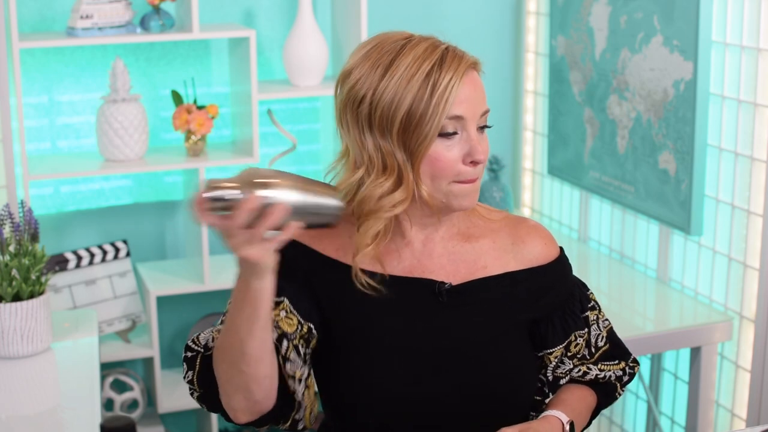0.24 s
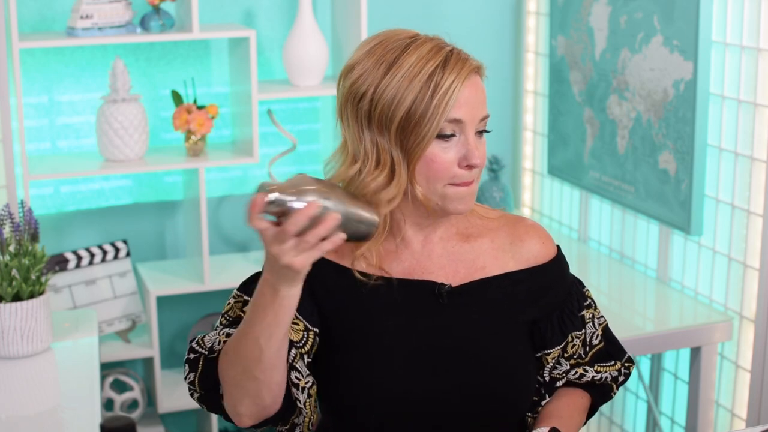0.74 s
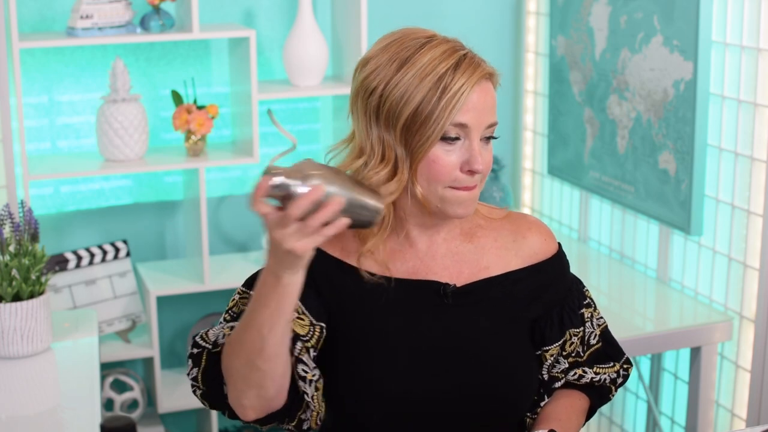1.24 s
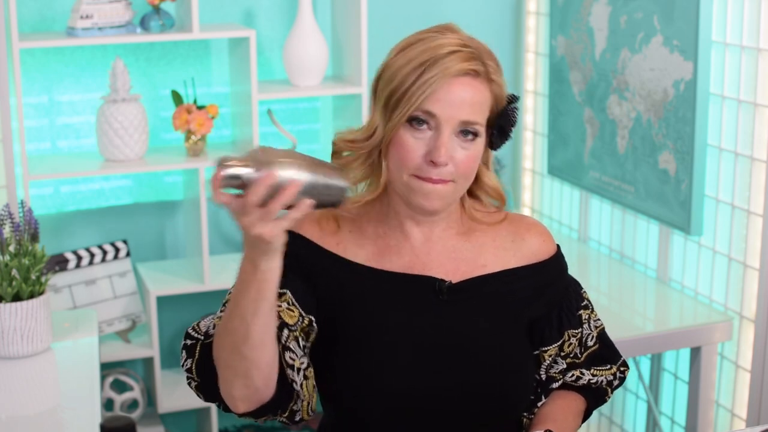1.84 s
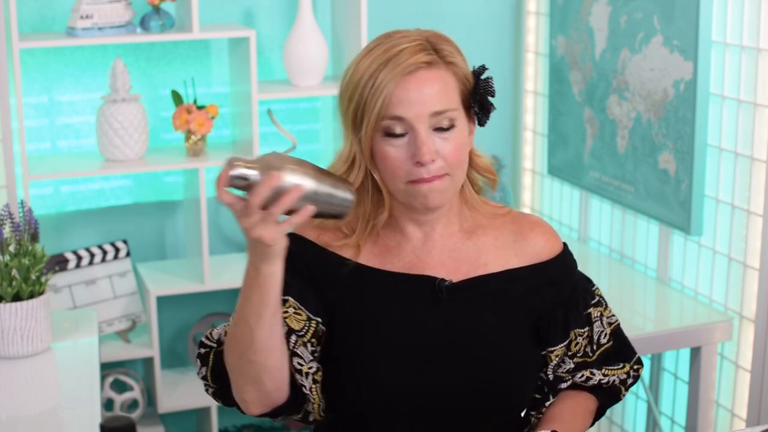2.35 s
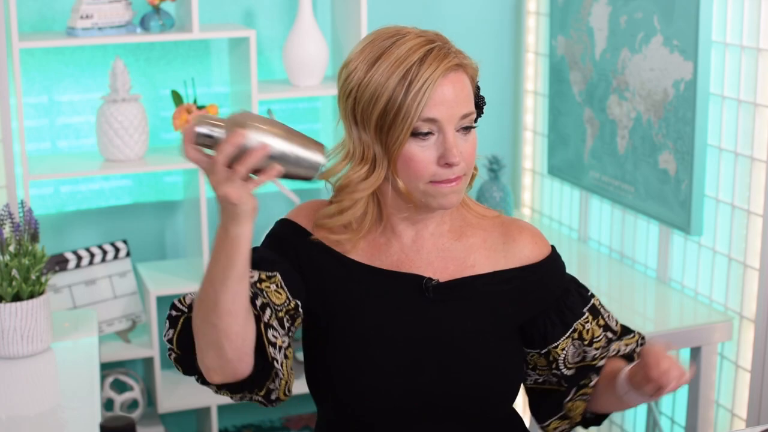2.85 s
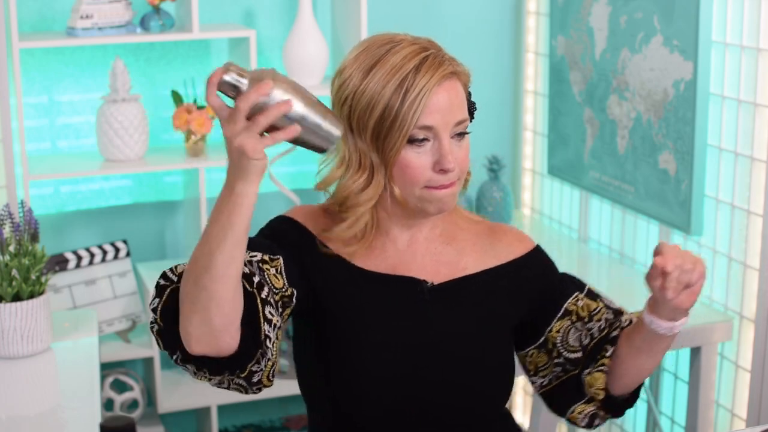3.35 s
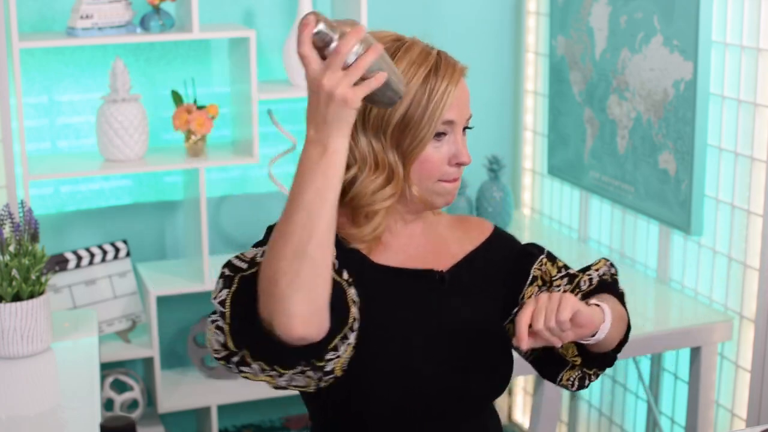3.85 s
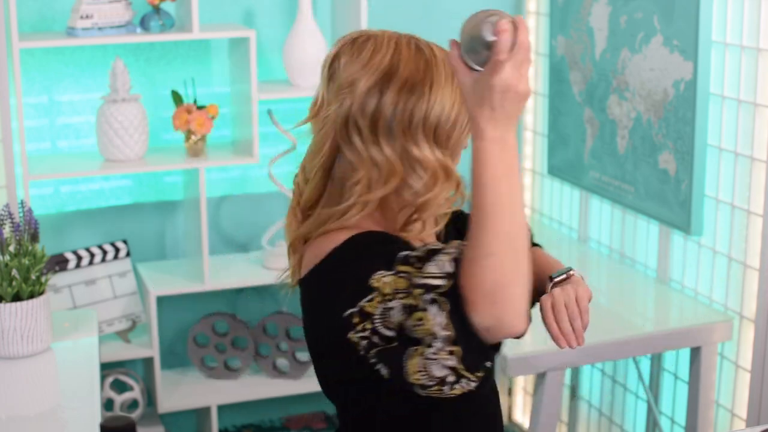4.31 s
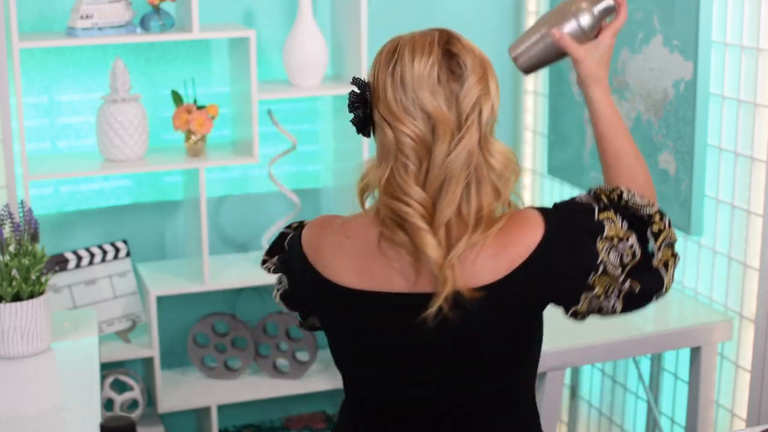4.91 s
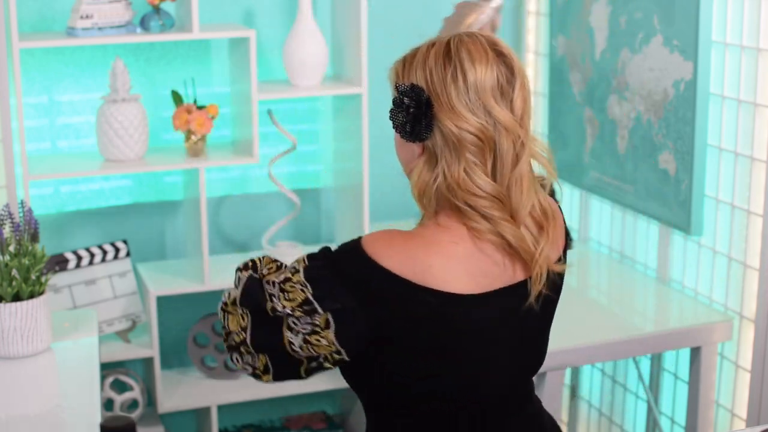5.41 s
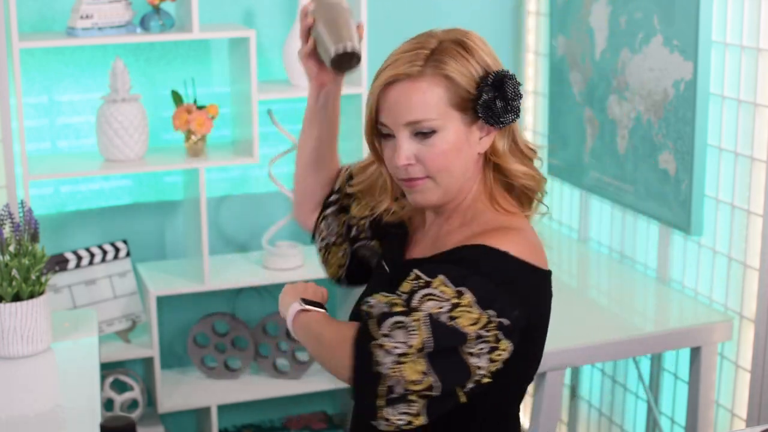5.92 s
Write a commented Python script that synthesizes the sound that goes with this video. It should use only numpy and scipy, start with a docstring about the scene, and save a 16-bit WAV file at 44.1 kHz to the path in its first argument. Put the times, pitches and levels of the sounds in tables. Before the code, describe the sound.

Close to the microphone in a small, quiet room, a hand-held steel shaker of ice and liquid is shaken continuously, about eight strokes a second. Each stroke lands as a crunchy burst of chips and splash with hard cube knocks. The rattle starts loud and full, then gradually softens and turns crisper, with a slight rise at the end.

```python
"""A small room, with the microphone hearing far more of the source than of its echoes.
Ice and drink are shaken hard in a steel cocktail shaker, about eight strokes a second.
At the end of each stroke the load lands: a swarm of small chips, a splash, and a few loud knocks of whole cubes.
Every contact thuds on the hand-damped can, rings its wall for a few milliseconds and ticks.
Stragglers, grazing pieces and fizzing droplets fill the gaps, over quiet room air."""
import sys
import numpy as np
from scipy import signal
from scipy.fft import rfft, irfft
from scipy.io import wavfile
from scipy.ndimage import uniform_filter1d

SR = 44100
rng = np.random.default_rng(int(sys.argv[2]) if len(sys.argv) > 2 else 0)


def store_wav(level_fs):
    """Save 16-bit WAV to argv[1]."""
    pcm = np.round(np.clip(np.atleast_2d(level_fs), -1, 1) * 32767)
    wavfile.write(sys.argv[1], SR, pcm.T.astype(np.int16))


N = 272097


def amp(db):
    """Amplitude factor of a level in dB."""
    return 10 ** (np.asarray(db) / 20)


def unit(x):
    """Scales each row to an energy of one."""
    return x / np.sqrt(np.sum(x ** 2, axis=-1, keepdims=True) + 1e-20)


def read(points, hz):
    """A table's value along a logarithmic frequency axis."""
    f, value = np.transpose(points)
    return np.interp(np.log(hz + 1), np.log(f), value)


def add(mix, s, sound):
    """Mixes a sound in at time s."""
    part = mix[max(round(s * SR), 0):][:len(sound)]
    part += sound[:len(part)]


def coloured(x, db):
    """Causal (minimum-phase) filter with the gain db on the bins of each row."""
    size = x.shape[-1]
    cepstrum = irfft(np.log(amp(db)), size)
    # folding the cepstrum forward puts the whole response after the blow
    cepstrum[..., 1:size // 2] *= 2
    cepstrum[..., size // 2 + 1:] = 0
    return irfft(rfft(x) * np.exp(rfft(cepstrum)), size)


TICK_SQUARENESS = 0.14  # share of the squareness that also sharpens the tick


def blow(force_db, squareness_db, bright_db):
    """Levels (thud, ring, tick) of a contact: a square blow thuds, a glancing one rings the wall."""
    thud_db = force_db + squareness_db
    ring_db = force_db - squareness_db
    tick_db = force_db + TICK_SQUARENESS * squareness_db + bright_db
    return np.stack([thud_db, ring_db, tick_db], -1)


# loud knocks of whole cubes: (time [s], force before the level trims [dB],
# squareness [dB]: + flat on the end of the can, - glancing off the wall, brightness of the tick [dB])
CUBE_KNOCKS = [(0.02, -31, -6, 3), (0.038, -27, -4.5, 1.5), (0.048, -32.5, -7, 5), (0.155, -42.5, -2.5, 12),
               (0.1725, -33, -1, 3), (0.224, -37.5, -6.5, -2), (0.24, -39.5, -8.5, 3),
               (.268, -27, -4.5, 2.5), (.279, -31, 1.5, 5.5), (0.295, -37.5, -4, 6),
               (0.3829, -42.5, 5, 13.5), (0.3945, -35.5, 5, 3), (.4382, -40, -11, 2),
               (0.477, -43.5, -9, -2), (0.4951, -27, -3, -1), (.5058, -29.5, -4, 1.5),
               (.5198, -32.5, -4, -6), (0.6023, -40.5, 7.5, 14), (.6611, -35.5, -0.5, 0),
               (.7228, -22.5, -2, -0.5), (.731, -36, -8.5, -8), (.763, -38.5, -4, 8),
               (0.8514, -31.5, -1.5, 8), (.9196, -38.5, -3.5, 3), (0.935, -36, -4.5, -11),
               (0.9498, -32, 2.5, 4), (0.9577, -31, -0.5, 1.5), (.967, -34, -8.5, 4), (1.0679, -33, 0, 8),
               (1.0752, -28, -3.5, 1.5), (1.0817, -32, -8.5, -4), (1.1838, -31.5, -3.5, -1),
               (1.1948, -38.5, -7.5, 7.5), (1.28, -40, -6.5, 4), (1.296, -39, -2.5, 5.5),
               (1.311, -31.5, -0.5, 5.5), (1.316, -35, -3, 5.5), (1.4235, -30.5, -4, 2.5),
               (1.4564, -46.5, 4.5, 10.5), (1.4762, -39.5, -9.5, 6), (1.5311, -31.5, -0.5, 7),
               (1.5446, -33.5, -5.5, 6.5), (1.5776, -39, -7.5, -3), (1.6378, -33.5, -5, 1),
               (1.6492, -29.5, -4.5, -2.5), (1.7815, -33.5, -5, 6.5), (1.794, -34.5, -8.5, -2),
               (1.8892, -28.5, -5.5, 1.5), (1.9984, -30, -2, 3), (2.0091, -40.5, -6, 6),
               (2.0401, -44.5, -13, 5), (2.1008, -30, -2.5, -0.5), (2.201, -40, -10, 6),
               (2.2209, -29.5, -3, 0), (2.3137, -35.5, -1.5, 4), (2.3365, -30, -2.5, -1),
               (2.4411, -35, 2, 3), (2.458, -33.5, -6, -14), (2.4695, -38, -3, 0), (2.554, -36.5, -6, -3),
               (2.733, -37, -4, -1.5), (2.794, -41, -5, 8), (2.8088, -34.5, -4, -6),
               (2.9396, -36, -6, -0.5), (3.0236, -40, -1.5, -14), (3.0521, -30.5, -4.5, -0.5),
               (3.1791, -35, -6.5, -3), (3.1893, -33, -4, 4.5), (3.301, -36.5, -3, -12),
               (3.449, -38, -2, 5), (3.46, -36.5, 0, -1), (3.533, -38.5, -7, -3), (3.659, -46.5, 2, -7),
               (3.8379, -40.5, -6.5, 4.5), (3.954, -46.5, -4.5, -3), (3.9655, -43, 5, 3),
               (4.0955, -39.5, 1, 4), (4.1464, -36, 2.5, -9), (4.157, -44.5, -5, 12.5),
               (4.2693, -39.5, 7, -2), (4.2806, -44.5, -1, 8), (4.3549, -45, 0.5, 3),
               (4.3824, -36, 6.5, -6), (4.4877, -47, -2.5, 6), (4.5164, -41, -3, 5), (4.602, -50.5, 6, 15),
               (4.6345, -37.5, -3.5, 2.5), (4.793, -46.5, 4.5, 3.5), (4.8747, -31.5, 2, -8),
               (5.052, -51.5, 4, 16.5), (5.0602, -42.5, -6.5, -1), (5.1405, -35, 0.5, -16),
               (5.267, -52, 0, 11), (5.28, -54, 0, 19), (5.2932, -49.5, 3, 16.5), (5.3006, -53.5, -3, 24),
               (5.3118, -47.5, 2, 15), (5.3776, -48, 6.5, -5), (5.4172, -45, -3, 7), (5.4252, -37, -2, -6),
               (5.6623, -39, -2.5, 0), (5.6799, -39, 1, -4), (5.8048, -42.5, -1, 8),
               (5.8125, -38.5, 0.5, 0), (5.9153, -40, -5.5, -2), (5.9303, -40.5, 5, 0),
               (5.947, -32, -0.5, -2.5), (5.9571, -36.5, -5.5, -7)]
CORNER_S = .0017  # a cube's second corner lands about this long after its first
HARD_DB, SLUSH_PER_DB = -31.5, .5  # the faster a cube flies, the more slush it pushes ahead


def cubes(thud_db=-1, ring_db=-1, tick_db=-1.5, second_db=-5, bounce_db=-12, bounce_s=.007, slush_db=-12, slush_s=.004):
    """A whole cube pushes slush ahead of it, lands on one corner, then on a second, and bounces once."""
    times, force_db, squareness_db, bright_db = np.transpose(CUBE_KNOCKS)
    levels_db = blow(force_db, squareness_db, bright_db) + [thud_db, ring_db, tick_db]
    # each delay varies by half either way
    chance = rng.uniform(.5, 1.5, (len(times), 3))
    more_slush_db = SLUSH_PER_DB * (force_db[:, None] - HARD_DB)
    slush = contacts(times - slush_s * chance[:, 0], levels_db + slush_db + more_slush_db)
    first_corner = contacts(times, levels_db)
    second_corner = contacts(times + CORNER_S * chance[:, 1], levels_db + second_db)
    bounce = contacts(times + bounce_s * chance[:, 2], levels_db + bounce_db)
    return slush + first_corner + second_corner + bounce


# held level, the small ice skids along the wall; raised, it drops flat on the end: (time [s], squareness [dB])
LANDING_SQUARENESS = [(0, -2), (1.7, -4), (3, -3.5), (3.7, 0), (4.3, 0.5), (5.2, .5), (6.1, -0.5)]


def landing(s):
    """How squarely the small ice lands at time s, in dB."""
    return np.interp(s, *np.transpose(LANDING_SQUARENESS))


# strokes, forth and back in turn: (time the load lands [s], lead of its first pieces [s],
# strength before the level trims [dB], brightness of its ticks [dB])
SHAKE_STROKES = [(.036, .017, -37, 1), (.178, 0.022, -44, 1), (.282, 0.017, -39.5, 0.5),
                 (.398, .028, -40, 5.5), (.507, 0.031, -38, 0.5), (.629, 0.028, -39.5, 5),
                 (.735, .013, -39.5, 0), (.855, 0.028, -39, 1), (0.959, 0.021, -41, -13),
                 (1.078, 0.033, -38, 3), (1.19, 0.02, -44.5, -2), (1.314, .024, -44.5, -1),
                 (1.424, .028, -42.5, -1), (1.546, 0.02, -42, 5), (1.65, 0.019, -45, 0),
                 (1.792, 0.039, -40, 4.5), (1.89, 0.025, -43, 3), (2.008, .016, -45, 4),
                 (2.106, 0.022, -46, 2), (2.226, 0.026, -42, 4.5), (2.334, .026, -40, -2.5),
                 (2.462, .018, -45, 3), (2.573, 0.036, -40.5, 1.5), (2.7, 0.054, -46.5, 2),
                 (2.801, 0.034, -44, -13), (2.94, 0.039, -47.5, 2.5), (3.054, .03, -43.5, -9),
                 (3.189, 0.039, -40, 6.5), (3.307, .02, -44.5, -5.5), (3.458, 0.017, -47, 1),
                 (3.556, .026, -45, -1), (3.722, .02, -46, 1.5), (3.841, 0.026, -47.5, 0.5),
                 (3.988, .028, -47, 3.5), (4.133, 0.051, -45, -7), (4.273, .042, -49, 7.5),
                 (4.386, 0.033, -49.5, -14), (4.526, .018, -48, 1), (4.63, 0.032, -47, -2.5),
                 (4.762, 0.031, -49, 0.5), (4.877, 0.062, -48.5, -3.5), (5.057, 0.044, -48.5, 6),
                 (5.137, 0.041, -45, -3.5), (5.298, .02, -53, 6), (5.42, 0.033, -44.5, 4),
                 (5.588, 0.045, -48, 8), (5.68, 0.025, -46, -5), (5.822, 0.019, -44.5, 4),
                 (5.949, 0.036, -41.5, 4), (6.089, .034, -45, 2.5)]
SCATTER_S = .038  # nominal time over which the load goes on arriving, before each swarm's linger factor
USUAL_DB, STRETCH_PER_DB = -44, 0.07  # a stroke above the usual strength lets the load straggle for longer


def swarm(count, spread_db, trim_db, edge, linger, variety_db):
    """Many contacts a stroke, swelling to the moment when the load lands and trailing off after it."""
    all_times, all_db = [], []
    for s, lead_s, strength_db, bright_db in SHAKE_STROKES:
        trail_s = linger * SCATTER_S * np.exp(STRETCH_PER_DB * (strength_db - USUAL_DB))
        # one contact at random in each equal slice of the swarm
        progress = (np.arange(count) + rng.random(count)) / count
        late_s = (lead_s + trail_s) * progress - lead_s
        swell = np.interp(late_s, [-lead_s, 0, trail_s], [edge, 1, edge ** 2])
        sizes = unit(swell * amp(spread_db * rng.uniform(-1, 1, count)))
        force_db = strength_db + 20 * np.log10(abs(sizes) + 1e-9)
        levels_db = blow(force_db, landing(s), bright_db)
        all_times.append(s + late_s)
        all_db.append(levels_db + variety_db * rng.standard_normal((count, 3)) + trim_db)
    return contacts(np.concatenate(all_times), np.concatenate(all_db))


def chips(thud_db=6.5, ring_db=6, tick_db=6.5):
    """Smaller pieces of ice clatter in around the cubes."""
    trim_db = [thud_db, ring_db, tick_db]
    return swarm(count=14, spread_db=8, trim_db=trim_db, edge=0.81, linger=.85, variety_db=4.5)


def splash(thud_db=-1, ring_db=-2, tick_db=0):
    """Drink and slush break on the steel in a dense fine spray."""
    trim_db = [thud_db, ring_db, tick_db]
    return swarm(count=30, spread_db=7, trim_db=trim_db, edge=0.46, linger=1.2, variety_db=3.0)


def stragglers(count=2, trim_db=-9, spread_db=3, squareness_db=-3, bright_db=-2, soonest=.25, latest=0.98):
    """As the can turns back, a few pieces that lag behind the load glance off the side wall."""
    stroke_s, _, strength_db, _ = np.transpose(SHAKE_STROKES)
    # soonest and latest are shares of the gap to the next stroke
    share = rng.uniform(soonest, latest, (len(stroke_s) - 1, count))
    times = (stroke_s[:-1, None] + np.diff(stroke_s)[:, None] * share).ravel()
    force_db = np.interp(times, stroke_s, strength_db) + trim_db
    force_db += spread_db * rng.standard_normal(len(times))
    return contacts(times, blow(force_db, squareness_db + landing(times), bright_db))


def tumble(count=330, thud_db=-58, ring_db=-51, tick_db=-59, spread_db=4, follow=0.2):
    """All the while loose pieces graze the side wall, a little harder when the shaking is harder."""
    times = (np.arange(count) + rng.random(count)) / count * N / SR
    stroke_s, _, strength_db, _ = np.transpose(SHAKE_STROKES)
    effort_db = follow * np.interp(times, stroke_s, strength_db - USUAL_DB)
    spread = spread_db * rng.standard_normal((count, 3))
    return contacts(times, effort_db[:, None] + spread + [thud_db, ring_db, tick_db])


def slosh(count=1100, thud_db=-66, ring_db=-63, tick_db=-62, spread_db=7.5):
    """Drink and slush never rest: a faint fizz of droplets runs on between the strokes."""
    times = rng.uniform(0, N / SR, count)
    return contacts(times, spread_db * rng.standard_normal((count, 3)) + [thud_db, ring_db, tick_db])


# the shaker goes from level beside the shoulder to overhead, and turns other sides to the microphone:
# (time [s], thud pitch [factor], bass [dB], typical tick pitch [Hz], height of that tick peak [dB], top treble [dB])
SHAKER_POSE = [(0, 0.97, 4, 4960, 3.5, 1), (.9, 0.89, 0, 8040, 4, 0), (1.4, 0.85, 4, 6600, 0.5, 0.5),
               (2.2, 0.88, 2, 7050, 4, 3), (3.1, 0.94, -4, 9700, 9, 3), (3.7, 1.06, 0, 8900, -2.5, 3),
               (4.2, 0.98, -4, 6540, 14.5, 7.5), (5.3, 0.99, -3.5, 7720, 12, 7),
               (6.1, 1.05, -2.5, 8050, 7, 4.5)]
CONTACT_S = .005  # the levels of a contact are means over this time


def contacts(times, levels_db, size=1024):
    """One sound for each row of (thud, ring, tick) levels; each spot on the can has its own colour."""
    count, t, hz = len(times), np.arange(size) / SR, np.fft.rfftfreq(size, 1 / SR)
    pose_s, *pose = np.transpose(SHAKER_POSE)
    pitch, bass_db, tick_hz, peak_db, treble_db = (np.interp(times, pose_s, column) for column in pose)
    thud = thuds(t, hz, count, pitch, bass_db)
    ring = rings(t, count)
    tick = ticks(t, hz, count, tick_hz, peak_db, treble_db)
    levels = amp(np.transpose(levels_db))
    parts = [unit(part) * level[:, None] for part, level in zip((thud, ring, tick), levels)]
    sounds = sum(parts) * np.sqrt(CONTACT_S * SR)
    out = np.zeros(N)
    for s, sound in zip(times, sounds):
        add(out, s, sound)
    return out


def crunch(t, count, decay_s):
    """The force of a contact: it builds within a moment, then crumbles away."""
    lasts = decay_s * np.exp(0.45 * rng.standard_normal((count, 1)))
    return rng.standard_normal((count, len(t))) * np.sqrt(t / lasts) * np.exp(-t / lasts)


def hump(hz, centres_hz, octaves):
    """One bell-shaped resonance for each contact."""
    return np.exp(-.5 * (np.log2((hz + 1) / centres_hz[:, None]) / octaves) ** 2)


# colour of the dull blow on the filled can, before the pose shifts its pitch: (frequency [Hz], level [dB])
THUD_COLOUR = [(30, -35), (90, -19.5), (170, -10.5), (280, -4), (480, -4), (760, 1.5), (980, 0),
               (1300, 0.5), (1750, -4.5), (3200, -34)]


def thuds(t, hz, count, pitch, bass_db):
    """The filled, hand-damped can takes the blow dully, with one resonance set by the spot struck."""
    colour_db = read(THUD_COLOUR, hz / pitch[:, None])
    colour_db += bass_db[:, None] / (1 + (hz / 300) ** 4)
    colour_db += 4 * hump(hz, pitch * rng.uniform(525, 1560, count), octaves=0.5)
    return coloured(crunch(t, count, decay_s=.0012), colour_db)


# modes of the steel wall, damped by hand and drink, before the drink shifts them:
# (frequency [Hz], level [dB], 60 dB decay time [s])
WALL_MODES = [(1570, -7.5, 0.0085), (1867, 0, 0.0057), (2064, -5.5, 0.011), (2350, -2.5, 0.017),
              (2480, -4, 0.015), (2753, -7.5, 0.009), (3210, -9, 0.0061), (4600, -7, 0.004)]


def rings(t, count):
    """The steel wall rings in a few strongly damped modes."""
    ring = np.zeros((count, len(t)))
    for mode_hz, db, t60 in WALL_MODES:
        # drink washing over the wall shifts its modes; the spot struck sets their strength and phase
        load, spot = rng.standard_normal((count, 1)), rng.uniform(0.27, 1, (count, 1))
        cycles = mode_hz * (1 + 0.068 * load) * t + rng.random((count, 1))
        ring += spot * amp(db - 60 * t / t60) * np.sin(2 * np.pi * cycles)
    # the blow takes a moment to spread round the wall
    return ring * (1 - np.exp(-(t / 0.00039) ** 2))


# colour of the crack of ice on steel: (frequency [Hz], level [dB])
TICK_COLOUR = [(1200, -25), (2800, -21), (3600, -3), (4600, 1), (6300, -1.5), (9000, 1.5), (11500, -2),
               (15800, -6)]
TREBLE_HZ = 12200  # above this the ticks depend on how the shaker is held


def ticks(t, hz, count, tick_hz, peak_db, treble_db):
    """Ice cracks briefly on steel; the size of the piece sets the pitch of its tick."""
    piece_hz = tick_hz * np.exp(0.21 * rng.standard_normal(count))
    colour_db = read(TICK_COLOUR, hz) + peak_db[:, None] * hump(hz, piece_hz, octaves=0.19)
    colour_db += treble_db[:, None] / (1 + (TREBLE_HZ / (hz + 1)) ** 6)
    return coloured(crunch(t, count, decay_s=0.00072), colour_db + cube_modes(count, len(hz)))


def cube_modes(count, size):
    """Every piece of ice has its own crowd of damped modes: a random ripple of its colour, in dB."""
    ripple = rng.standard_normal((count, size))
    for _ in range(2):
        ripple = uniform_filter1d(ripple, size=28, axis=1)
    return 4.5 * ripple / ripple.std()


# reverberation of the room: (frequency [Hz], 60 dB decay time [s])
ROOM_DECAY = [(150, 0.35), (600, 0.36), (2500, 0.25), (8000, 0.31), (16000, 0.23)]


def room(x, early_db=-14, tail_db=-11, count=8):
    """A few echoes from the near walls and shelves, then a short diffuse tail."""
    t = np.arange(SR // 2) / SR
    hz, frame_s, z = signal.stft(rng.standard_normal(len(t)), SR, nperseg=256)
    decay = amp(-60 * frame_s / read(ROOM_DECAY, hz)[:, None])
    tail = signal.istft(z * decay, SR, nperseg=256)[1][:len(t)]
    tail *= 1 - np.exp(-t / 0.00057)
    early = np.zeros(len(t))
    early[(rng.uniform(.003, .018, count) * SR).astype(int)] = rng.choice([-1, 1], count)
    response = amp(early_db) * unit(early) + amp(tail_db) * unit(tail)
    return signal.fftconvolve(x, response)[:N]


# colour of the background air, before it is set to its level: (frequency [Hz], density [dB per Hz])
AIR_COLOUR = [(20, -15), (45, 15), (60, 3), (80, -12), (200, -12), (1000, -4.5), (16000, -27)]


def air(level_db=-72):
    """The quiet steady background of the room: coloured noise."""
    colour = amp(read(AIR_COLOUR, np.fft.rfftfreq(N, 1 / SR)))
    noise = irfft(rfft(rng.standard_normal(N)) * colour, N)
    return amp(level_db) * unit(noise) * np.sqrt(N)


def scene(count=5, rounds_hz=1.299):
    """The shaker moves about, so its echoes keep changing between a few patterns."""
    shaker = cubes() + chips() + splash() + stragglers() + tumble() + slosh()
    # the patterns take turns in a ring, each fading into the next
    turn = np.arange(N) / SR * rounds_hz * count
    apart = abs((turn - np.arange(count)[:, None] + count / 2) % count - count / 2)
    shares = np.cos(np.pi / 2 * np.minimum(apart, 1))
    echoes = sum(room(shaker * share) for share in shares)
    return (shaker + echoes + air())[None]


EDGE_HZ = 15900  # upper band limit of the recorder


def record(dry, low_cut_hz=70, ceiling_db=-10):
    """The microphone's bass roll-off, soft overload on the hardest knocks, and the recorder's band limit."""
    thin = signal.sosfilt(signal.butter(2, low_cut_hz, "highpass", fs=SR, output="sos"), dry)
    rounded = amp(ceiling_db) * np.tanh(thin / amp(ceiling_db))
    band_limit = signal.firwin(511, EDGE_HZ, window=("kaiser", 9), fs=SR)
    return signal.oaconvolve(rounded, band_limit[None], "same")


dry = scene()
out = record(dry)
store_wav(out)
```